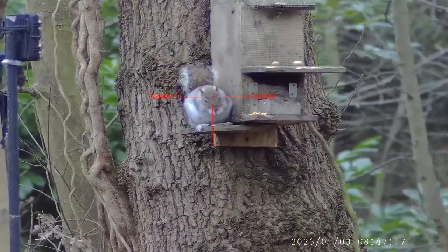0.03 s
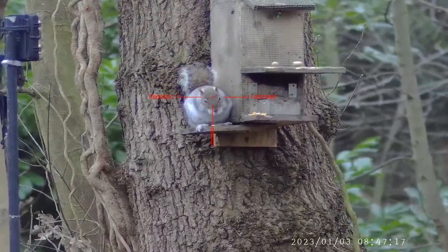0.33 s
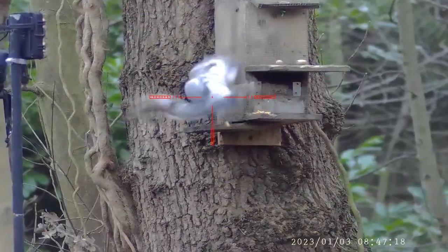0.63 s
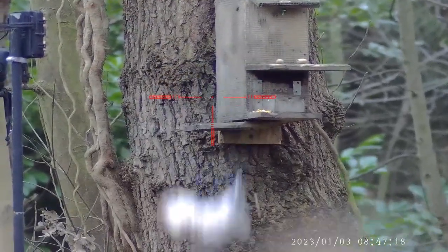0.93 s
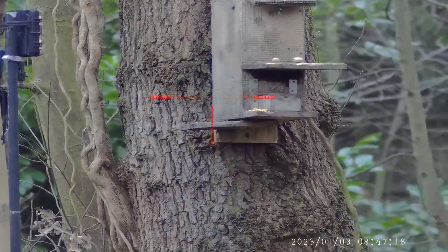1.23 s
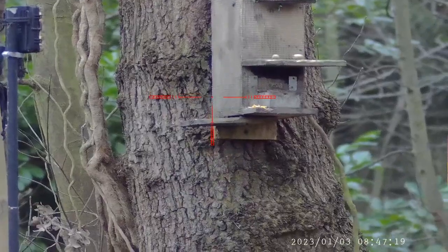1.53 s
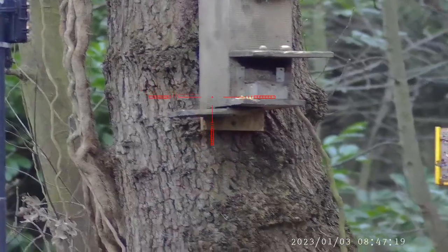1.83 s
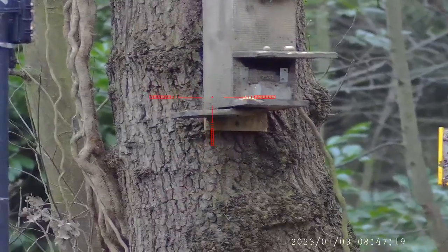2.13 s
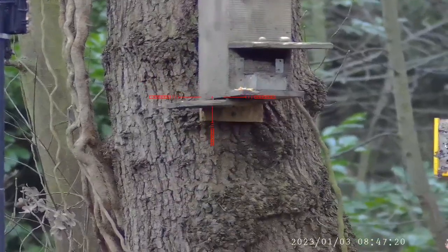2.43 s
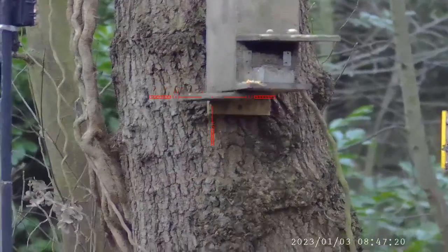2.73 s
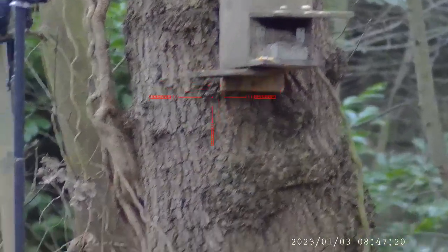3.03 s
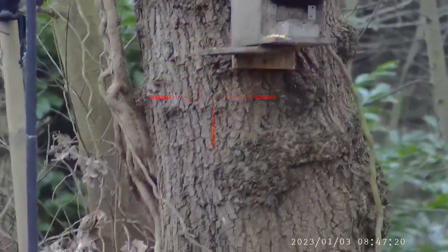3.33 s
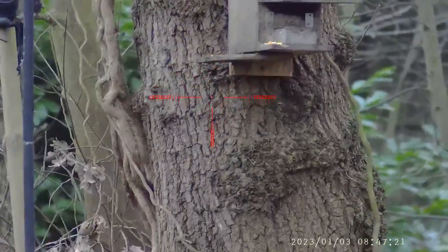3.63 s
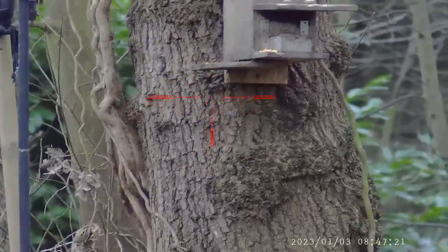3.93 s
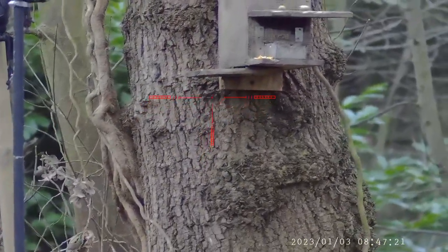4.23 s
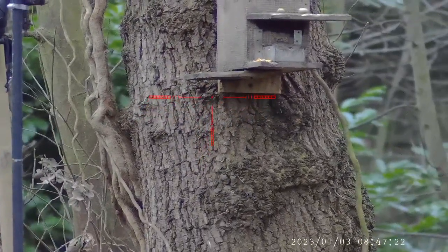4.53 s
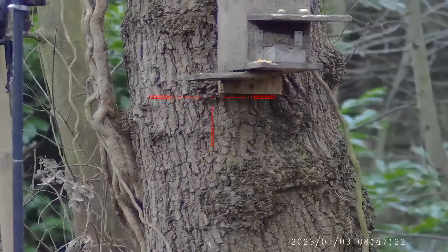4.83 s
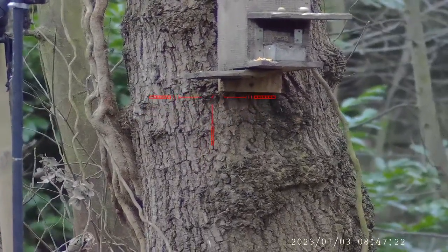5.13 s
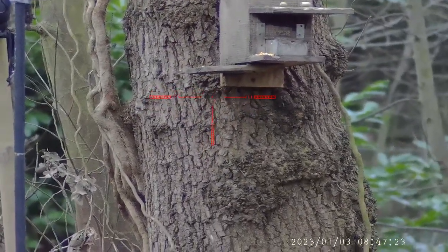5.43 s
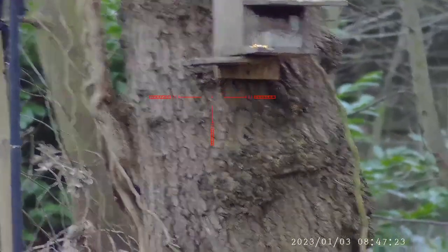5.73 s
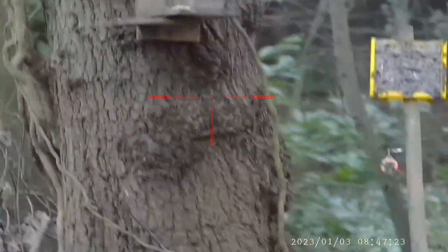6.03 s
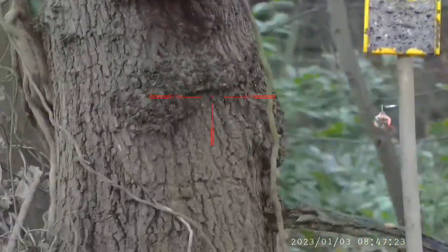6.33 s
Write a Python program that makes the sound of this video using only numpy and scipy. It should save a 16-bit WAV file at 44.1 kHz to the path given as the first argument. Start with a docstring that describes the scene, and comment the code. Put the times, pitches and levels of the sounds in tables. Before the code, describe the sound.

One sharp air rifle crack in a wood, with a brief spring twang and short echo over faint hiss and rumble.

```python
"""A spring-piston air rifle fires once in a wood.
The sear trips and the piston slams and rebounds, each impact exciting the modes of the rifle's body.
Compressed air cracks from the muzzle, and the mainspring rattles and twangs in free vibration.
The pellet knocks on something far off, and the trees scatter the shot back over a faint rumble.
A camera on the scope hears it all, adding its own electronic whine, gain control and overload."""
import sys
import numpy as np
from scipy import signal
from scipy.fft import rfft, irfft
from scipy.io import wavfile
from scipy.ndimage import uniform_filter1d, minimum_filter1d

SR = 44100
rng = np.random.default_rng(int(sys.argv[2]) if len(sys.argv) > 2 else 0)


def digitize_waveform(pressure):
    """Quantize a signal to 16-bit integers and store it at the path in sys.argv[1].

    Rows of a 2-D input are taken as channels; values are limited to [-1, 1].
    """
    field = np.atleast_2d(pressure).T
    bounded = np.clip(field, -1, 1)
    quanta = np.round(bounded * 32767).astype(np.int16)
    wavfile.write(sys.argv[1], SR, quanta)


N = 282240
TIME = np.arange(N) / SR
FREQ = np.fft.rfftfreq(N, 1 / SR)
RING_TIME = TIME[:SR // 2]
MUZZLE_S = .4647


def rifle():
    """Radiation from a small body: action, spring and muzzle are too small to give much deep bass."""
    low_cut = signal.butter(2, 80, "high", fs=SR, output="sos")
    return signal.sosfilt(low_cut, action() + mainspring() + muzzle())


def action():
    """Impact excitation: sear and piston ring the rifle's body, and wider resonances decay faster."""
    # sear, piston slam, rebounds and a rattle of the spring: start_s, relative_db, contact_ms
    blows = [(.4622, -13, .25), (0.4649, 4.5, .08), (.466, -8, .05), (0.4679, -5, .05), (0.4732, -2.5, .1),
             (.4777, -12, 0.05988), (.4803, -7, .35)]
    # resonances of stock, cylinder and barrel: pitch_hz, width_hz, relative_db
    resonances = [(197, 60.0, -14.5), (572, 66.6, -4), (647, 50, -1), (750, 80.0, -9.5), (856, 50.2, -2.5),
                  (1050.0, 65.0, 1), (1125, 60, -10.5), (1234.7, 65.0, -4.5), (1305.0, 55.0, -0.5),
                  (1753, 60.0, -5.5), (1980, 50.0, -8.5), (2194, 60.0, -6.0), (2400, 60, -11),
                  (3180.0, 50.0, -8.5), (3410, 50.0, -15), (3475.0, 56, -10.5), (3680, 36, -13.5),
                  (4170.0, 90.0, -14), (4965, 55.0, -12.5), (5469, 86, -12), (6695, 70.0, -13),
                  (6820, 55.0, -12.5), (7771, 45.0, -9.5), (8100, 45.0, -13), (8230, 38, -11),
                  (8580.0, 34, -14.5)]
    ring = 0
    for k, (hz, width, db) in enumerate(resonances):
        envelope = amp(db) * width * np.exp(-np.pi * width * RING_TIME)
        ring = ring + (-1) ** k * envelope * np.sin(2 * np.pi * hz * RING_TIME)
    # the ring is thin between its low thump and its woody knock, 250 to 500 Hz
    ring = signal.sosfilt(signal.butter(2, (250, 500), "bandstop", fs=SR, output="sos"), ring)
    ring = ring / ring[:SR // 100].std()  # unit rms over the first 10 ms
    return amp(-4.5) * strike(ring, blows)


def muzzle():
    """Sudden expansion: compressed air bursts out behind the pellet, and the last of it hisses away."""
    # spectrum of the crack: frequency_hz, relative_db
    crack_spectrum = [(70, -14), (190, -6), (300, -13), (430, -13), (580, -0.5), (1300, -2), (1500, -14),
                      (1900, -0.5), (2800, -7.5), (5400, -6), (5950, -18), (8200, -7.5), (9800, -36),
                      (15000, -42)]
    crack = amp(4) * noise(colour(crack_spectrum)) * burst(MUZZLE_S, rise=.0005, t60=.038)
    hiss_hold_s, hiss_corner_hz = .046, 7000
    flow = (TIME > MUZZLE_S) * fade(np.maximum(TIME - MUZZLE_S - hiss_hold_s, 0), t60=.02)
    hiss = amp(-37) * noise(-10 * np.log10(1 + (FREQ / hiss_corner_hz) ** 2))
    return crack + hiss * flow


def mainspring():
    """Free vibration: the released spring overshoots, rattles on its guide and twangs on alone."""
    # modes of the spring: pitch_hz, relative_db, t60_s
    spring_modes = [(138.1, -29, 0.13), (215, -23, 0.075), (1057, 2, 0.033), (1163.0, -4.5, 0.045),
                    (1308, -10, 0.185), (1335, 0, 0.059), (2200.0, -22.5, 0.185), (3967.0, -25, 0.06),
                    (7584, -24, 0.065), (7760, -21, 0.055), (8885.0, -14.5, 0.043), (9000, -31, 0.085)]
    # spectrum of the rattling coils: frequency_hz, relative_db
    rattle_spectrum = [(150, -8), (420, -5), (700, -6), (1200, -8.5), (1550, -16), (3400, -4.5),
                       (4600, -13), (5900, -24), (7700, -6), (9000, 0), (10500, -17.5), (15000, -25)]
    # ticks of the coils settling on the guide: start_s
    tick_starts = [.4955, .5035, .5185, .541]
    push_s = .004
    twang = modes(spring_modes) * (1 - np.exp(-RING_TIME / push_s))
    rattle = amp(-4) * noise(colour(rattle_spectrum)) * burst(.4735, rise=.002, t60=.048)
    # each tick, fainter than the last, rings one broad resonance of the guide
    guide_hz, guide_width_hz, fall_db_per_s = 3698, 600, 430
    guide_db = -20 * np.log10(1 + ((FREQ - guide_hz) / guide_width_hz) ** 2)
    ticks = 0
    for start in tick_starts:
        tick_db = -35 - fall_db_per_s * (start - tick_starts[0])
        ticks = ticks + amp(tick_db) * burst(start, rise=.001, t60=.03)
    return place(twang, start=.4805) + rattle + noise(guide_db) * ticks


def pellet():
    """Contact time sets brightness: a distant knock as the pellet lands, a duller one as it bounces."""
    # landing and bounce: start_s, relative_db, contact_ms
    knocks = [(0.6835, -43, .05), (.7324, -44.5, 0.98)]
    # modes of the struck object: pitch_hz, relative_db, t60_s
    target_modes = [(617, -5, 0.027), (1046, -1.5, .04), (1205, 0.5, 0.038), (1420, -4, .03),
                    (1860, -7, .02), (2120, -5, .035), (2300, -4, .035)]
    return amp(-7) * strike(modes(target_modes), knocks)


def trees():
    """Scattering: many trunks return the shot as diffuse swells of noise."""
    # spectrum of the echoes: frequency_hz, relative_db
    echo_spectrum = [(100, -3), (500, 1), (1200, -0.5), (2500, -11), (4000, -15), (5500, -12),
                     (8000, -11.5), (14000, -25)]
    # returns from the near trunks, the wood's edge and its depth: start_s, level_db, rise_s, t60_s
    echoes = [(.49, -58, .02, .5), (.57, -62, 0.033, 0.45), (.64, -74, .056, 2.5)]
    envelope = sum(amp(db) * burst(start, rise, t60) for start, db, rise, t60 in echoes)
    return noise(colour(echo_spectrum)) * envelope


def background():
    """Broadband noise and line spectrum: distant rumble and hiss under the whine of the electronics."""
    # spectrum of the rumble and hiss: frequency_hz, relative_db
    air_spectrum = [(20, 27), (50, 11), (110, 0.5), (170, -1), (350, -4), (700, -7), (1200, -11),
                    (2000, -16), (4000, -22.5), (6300, -25), (9000, -26.5), (15000, -30)]
    # narrow bands of hiss around the whine: centre_hz, width_hz, boost_db
    hiss_bands = [(5144, 160, 6), (6950, 150, 12), (7730, 220, 10), (10900, 300, 6), (12100, 250, 4)]
    # steady tones of the camera's electronics: pitch_hz, relative_db
    whine_tones = [(1001, -80), (2008, -87), (3009, -90), (4016, -82), (5017, -78.5), (5146, -89),
                   (5959, -82), (6019, -91), (6961, -76), (7025, -81), (7962, -80), (8027, -81),
                   (9033, -96), (9970, -89), (10034, -87), (10912, -92), (10977, -90), (11036, -86),
                   (11913, -84), (12042, -92), (13044, -99), (14987, -101)]
    bands_db = sum(db * np.exp(-((FREQ - hz) / width) ** 2) for hz, width, db in hiss_bands)
    air = amp(-64.5) * noise(colour(air_spectrum) + bands_db)
    tones = sum(amp(db) * np.sin(2 * np.pi * (hz * TIME + rng.random())) for hz, db in whine_tones)
    whine = amp(-1.13) * np.sqrt(2) * tones
    # both come up a little after the shot, then slowly sink back
    lift_db, rise_s, sink_db_per_s = 3, .25, .3
    since_shot = np.maximum(TIME - MUZZLE_S, 0)
    swell_db = lift_db * (1 - np.exp(-since_shot / rise_s)) - sink_db_per_s * since_shot
    return (air + whine) * amp(swell_db)


def modes(table):
    """Modal superposition: a free ring is a sum of damped sines, here of alternating sign."""
    return sum((-1) ** k * amp(db) * fade(RING_TIME, t60) * np.sin(2 * np.pi * hz * RING_TIME)
               for k, (hz, db, t60) in enumerate(table))


def strike(ring, blows):
    """Finite contact acts as a low-pass: each blow starts the ring, a longer contact more dully."""
    struck = 0
    for start, db, contact_ms in blows:
        lag_s = contact_ms / 1000 / (2 * np.pi)
        struck = struck + amp(db) * place(smooth(ring, lag_s), start)
    return struck


def amp(db):
    """Amplitude ratio of a level in decibels."""
    return 10 ** (np.asarray(db) / 20)


def colour(points):
    """Spectral envelope in dB, interpolated on a log-frequency axis."""
    hz, db = np.transpose(points)
    return np.interp(np.log(FREQ + 1), np.log(hz), db)


def noise(spectrum_db):
    """Spectral shaping of white noise, scaled to unit rms above 100 Hz."""
    gain = amp(spectrum_db)
    gain = gain / np.sqrt(np.mean(gain[FREQ > 100] ** 2))
    return irfft(rfft(rng.standard_normal(N)) * gain, N)


def fade(t, t60):
    """Exponential decay, 60 dB down after t60 seconds."""
    return np.exp(-np.log(1000) * t / t60)


def burst(start, rise, t60):
    """Transient envelope: exponential rise and decay, with times in seconds."""
    age = np.maximum(TIME - start, 0)
    return (1 - np.exp(-age / rise)) * fade(age, t60)


def place(x, start):
    """Pure delay: a short sound begins at start seconds."""
    first = int(round(start * SR))
    return np.pad(x, (first, N))[:N]


def smooth(x, lag_s):
    """First-order lag: a low-pass with the given time constant."""
    keep = np.exp(-1 / (lag_s * SR))
    return signal.lfilter([1 - keep], [1, -keep], x)


def scene():
    """Superposition: one shot and its echoes over the quiet wood, in mono."""
    return (rifle() + pellet() + trees() + background())[None]


def gain_control(x, threshold_db, attack_s, hold_s, release_db_per_s, overshoot, settle_s):
    """Automatic gain control: a peak ducks the gain, then a slower lag lifts it past unity and settles."""
    power = uniform_filter1d(x ** 2, size=88)  # 2 ms mean
    excess_db = np.maximum(10 * np.log10(np.maximum(power, 1e-12)) - threshold_db, 0)
    recovery_db = release_db_per_s * TIME
    falling_db = np.maximum.accumulate(excess_db + recovery_db) - recovery_db
    half_hold = int(hold_s * SR / 2)
    held_db = -minimum_filter1d(-falling_db, 2 * half_hold + 1, origin=half_hold)  # trailing maximum
    return x * amp(overshoot * smooth(held_db, settle_s) - smooth(held_db, attack_s))


def record(dry):
    """Compression and saturation: the camera ducks, swells back, overloads and cuts both band edges."""
    x = gain_control(dry[0], threshold_db=-1.38, attack_s=.0043, hold_s=.073,
                     release_db_per_s=120, overshoot=2.4, settle_s=.12)
    # soft overload adds a mid-range grit; what still sticks out is clipped flat
    grit = x / (1 + x ** 4) ** .25 - x
    x = x + signal.sosfiltfilt(signal.butter(2, (200, 8000), "band", fs=SR, output="sos"), grit)
    low_cut_hz, high_cut_hz = 100, 15500
    x = signal.sosfilt(signal.butter(2, low_cut_hz, "high", fs=SR, output="sos"), x)
    x = np.clip(x, -1, 1)
    return signal.sosfilt(signal.ellip(8, .2, 80, high_cut_hz, fs=SR, output="sos"), x)[None]


dry = scene()
out = record(dry)
digitize_waveform(out)
```